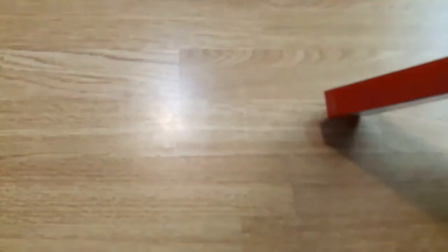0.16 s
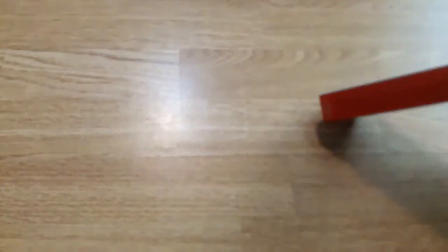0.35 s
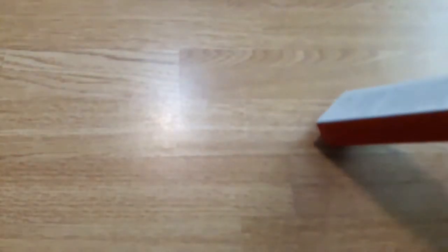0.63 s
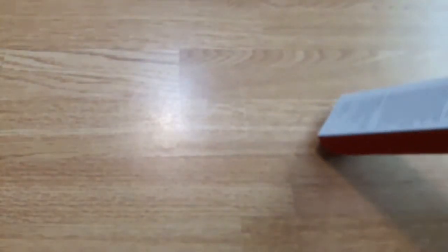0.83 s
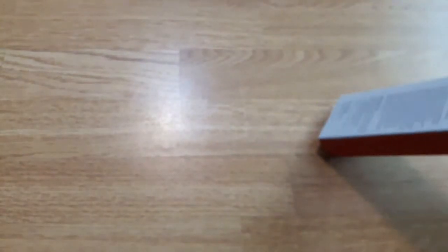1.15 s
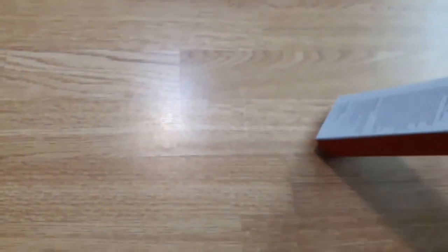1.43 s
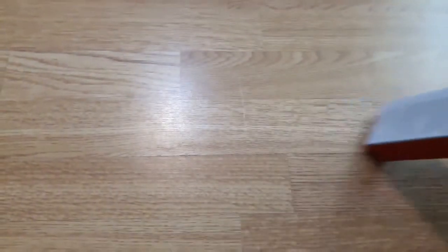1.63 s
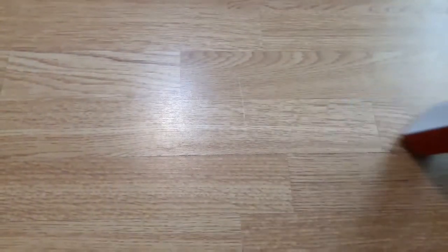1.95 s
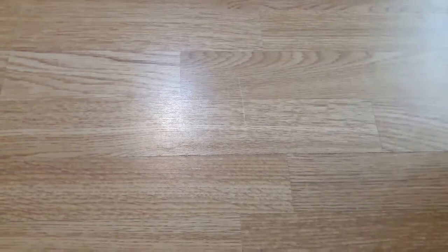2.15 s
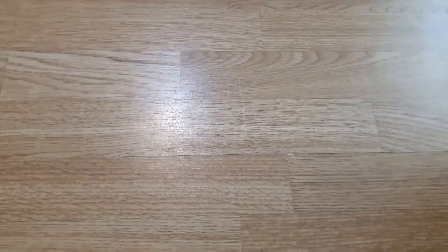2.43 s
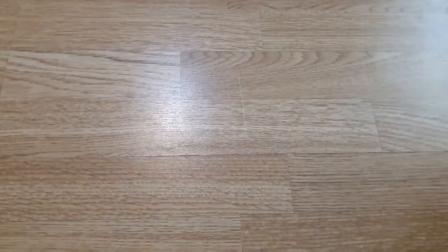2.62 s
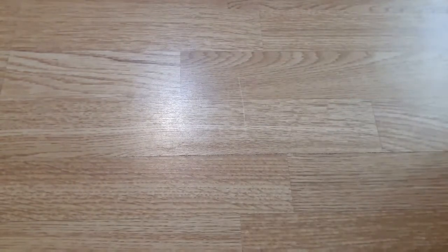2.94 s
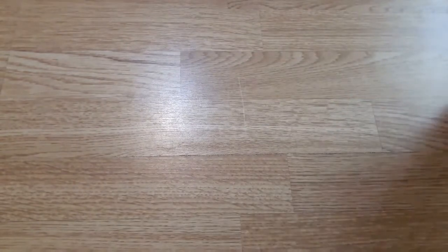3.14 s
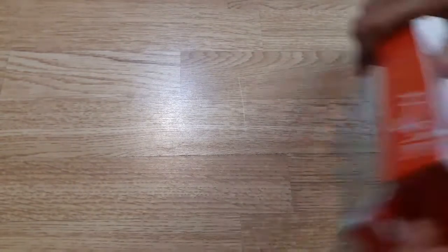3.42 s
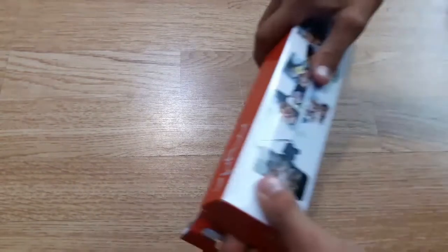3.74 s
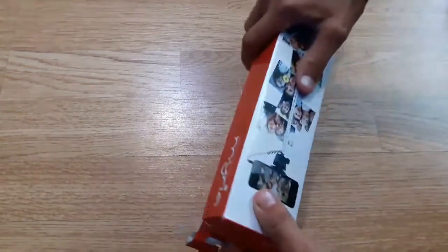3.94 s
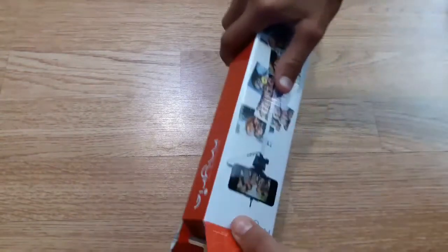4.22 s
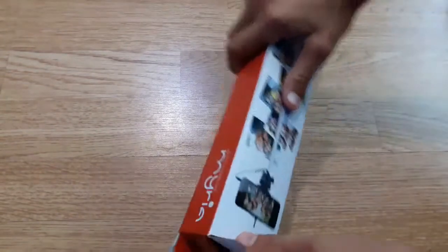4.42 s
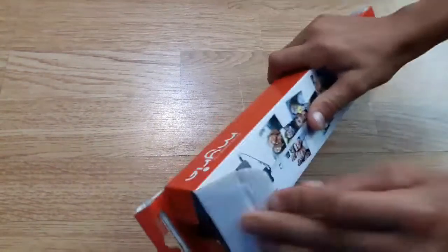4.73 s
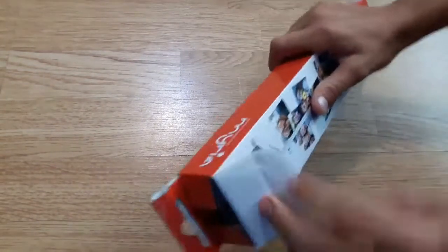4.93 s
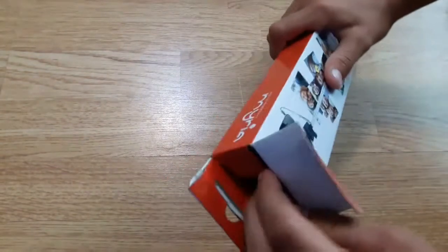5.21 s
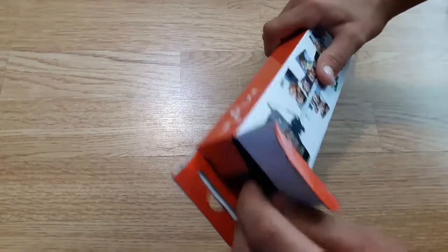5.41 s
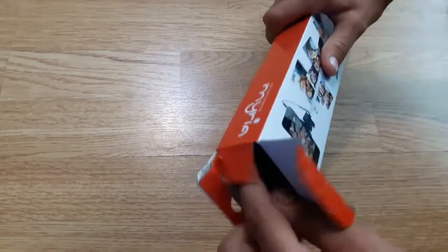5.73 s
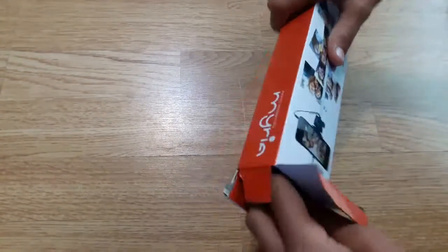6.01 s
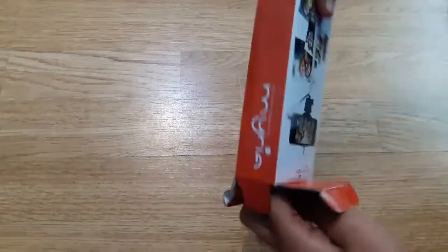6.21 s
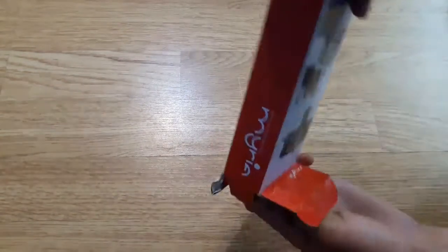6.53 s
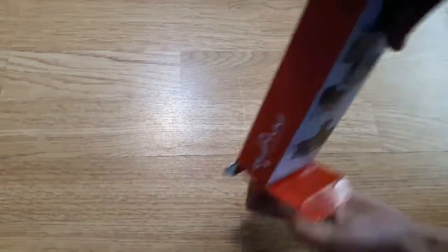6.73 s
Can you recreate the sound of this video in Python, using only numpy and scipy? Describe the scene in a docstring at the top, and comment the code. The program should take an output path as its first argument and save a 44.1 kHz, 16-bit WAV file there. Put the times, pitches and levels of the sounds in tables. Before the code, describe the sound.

A slim cardboard box is rubbed and knocked close by, then its flap tab snaps open with two hard knocks, scuffs and rustling in a small room.

```python
"""A slim cardboard box is handled on a wooden floor close to a stereo microphone, in a small room with a faint hum.
First the box is rubbed and knocked, and a face groans briefly; after a near lull with faint hollow knocks come drags
and scuffs. After a few stray snaps, the end flap's tab snaps in quick succession from 3.4 s, with the two hardest
knocks near 4.1 s; rubs, scuffs and lighter knocks follow to the end. Random friction and contact forces ring the
modes of cavity, faces, flap and tab; filtered noise makes the paper crackle, the room's echoes and the room tone."""
import sys
import numpy as np
from scipy import signal
from scipy.fft import rfft, irfft, next_fast_len
from scipy.io import wavfile
from scipy.ndimage import map_coordinates

SR = 44100
rng = np.random.default_rng(int(sys.argv[2]) if len(sys.argv) > 2 else 0)


def store_wav(level_fs):
    """Save 16-bit WAV to argv[1]."""
    pcm = np.round(np.clip(np.atleast_2d(level_fs), -1, 1) * 32767)
    wavfile.write(sys.argv[1], SR, pcm.T.astype(np.int16))


N = 302526

# nominal modes of the enclosed air: f/Hz, relative level/dB, t60/s
CAVITY_MODES = [(166, -26, 0.037), (193, -5.5, 0.094), (246.3, -10.5, 0.052)]
# nominal modes of the long faces: f/Hz, relative level/dB, t60/s
FACE_MODES = [(355, 2.7, 0.01), (399, 10.1, 0.023), (534, 4.9, 0.029), (709, 9.2, 0.02)]
# nominal modes of the end flap: f/Hz, relative level/dB, t60/s
FLAP_MODES = [(775, -11, 0.075), (897, 2.5, 0.034), (1030, 5.5, 0.026), (1160, 0.5, 0.058),
              (1293, 11, 0.0087)]
# nominal modes of the flap's tab: f/Hz, relative level/dB, t60/s
TAB_MODES = [(1638, 9, 0.0085), (1940, 4, 0.011), (2240, 13, 0.0032), (2556, -10.5, 0.014),
             (3370, -7, 0.0057), (4190, 9.5, 0.00098)]
# spectrum of paper-edge crackle: f/Hz, relative density/dB per Hz
EDGE_SPECTRUM = [(3000, -9.5), (4300, 7), (5000, 8.5), (7000, 4), (10000, -2), (15000, -6)]
# grip wandering over the box: t/s, hollow body re flap/dB, tab re flap/dB, paper-edge crackle/dB
GRIP_PATH = [(0, 5.5, -3.5, -0.5), (1.25, 11, -6, 2), (1.7, 2.5, -3, 1), (2.2, 3.5, 0.5, -2),
             (2.6, 14, 4, -2), (3.3, -7.5, -9, -4.5), (3.5, -27, -1, 0.5), (3.8, -20, -2.5, -3.5),
             (4.0, -16, -3, -3), (4.4, 5, -4.5, 1.5), (4.7, 4.5, 4.5, -0.5), (5.1, -5, -12, 5),
             (5.5, 0, -0.5, 1), (5.95, -1.5, 3, -1.5), (6.2, -7.5, 1.5, -2), (6.6, -17, 0, 1.5),
             (6.86, 3, 0, -5.5)]


def amp(db):
    """Amplitude ratio of a level in dB."""
    return 10 ** (np.asarray(db) / 20)


def unit(x):
    """x scaled to RMS 1."""
    return x / np.sqrt(np.mean(x ** 2) + 1e-20)


def top(x):
    """x scaled to peak 1."""
    return x / np.max(np.abs(x))


def along(points, hz):
    """Interpolate (f/Hz, value) points on a log frequency axis."""
    f, v = np.transpose(points)
    return np.interp(np.log(hz + 1), np.log(f + 1), v)


def curves(rows):
    """One value per sample for each column after the time."""
    s, *cols = np.transpose(rows)
    return [np.interp(np.arange(N) / SR, s, c) for c in cols]


def wobble(rate_hz):
    """Smooth random curve with rate_hz knots a second."""
    knots = rng.standard_normal(int(N * rate_hz / SR) + 4)
    return map_coordinates(knots, [np.arange(N) * rate_hz / SR])


def filtered(x, response):
    """x shaped by a response given as a function of f/Hz."""
    m = next_fast_len(x.shape[-1] + 8192)
    spectrum = rfft(x, m) * response(np.fft.rfftfreq(m, 1 / SR))
    return irfft(spectrum, m)[..., :x.shape[-1]]


def air():
    """Room tone, partly alike at both ports only in the bass, and the narrow wavering hum of a far appliance."""
    # room tone and hiss: f/Hz, relative density/dB per Hz
    tone_spectrum = [(24, -24), (40, 27.5), (53, 13.5), (112, 10.5), (167, 4.5), (269, -7), (1720, -15.5),
                     (8990, -37), (14100, -33.5), (16000, -55)]
    # left-right correlation of the room tone: f/Hz, correlation (1 = alike)
    tone_likeness = [(60, 0.4), (150, 0), (300, 0), (700, 0)]
    # appliance hum: centre f/Hz, width/Hz, level/dB
    hum_setting = (165.6, 5, -62.5)

    def mid_side(hz):
        angle = np.arccos(np.clip(along(tone_likeness, hz), -1, 1)) / 2
        return amp(along(tone_spectrum, hz)) * [np.cos(angle), np.sin(angle)]

    mid, side = filtered(rng.standard_normal((2, N)), mid_side)
    tone = unit(np.array([mid + side, mid - side]))
    hum_hz, width_hz, hum_db = hum_setting
    hum = filtered(rng.standard_normal(N), lambda hz: np.exp(-((hz - hum_hz) / width_hz) ** 2))
    return amp(-54.5) * tone + amp(hum_db) * unit(hum)


def echoes(x, t60, size):
    """x through unrelated left and right noise tails, drawn anew each quarter tail so no fixed colour builds up."""
    out = np.zeros((2, N + 2 * size))
    step = size // 4
    for at in range(0, N, step):
        hz, t, z = signal.stft(rng.standard_normal((2, size)), SR, nperseg=64)
        decay = amp(-60 * t / along(t60, hz)[:, None])
        tail = signal.istft(z * decay, SR, nperseg=64)[1]
        tail = tail / np.linalg.norm(tail, axis=1, keepdims=True)  # energy 1
        piece = signal.fftconvolve(x[None, at:at + step], tail, axes=1)
        out[:, at:at + piece.shape[1]] += piece
    return out[:, :N]


def room(x):
    """The walls answer after a few milliseconds with frequency-dependent decay."""
    # reverberation: f/Hz, t60/s
    room_t60 = [(150, 0.37), (1000, 0.31), (5000, 0.24), (15000, 0.19)]
    # room against direct sound: f/Hz, level/dB
    room_level = [(100, -18.5), (400, -8.5), (1500, -4.5), (5000, -6), (12000, 0)]
    delayed = np.pad(x, (200, 0))
    return echoes(filtered(delayed, lambda hz: amp(along(room_level, hz))), room_t60, size=22000)


def ports(x):
    """Arrival time and level place the box; hands and floor scatter the treble to each port differently."""
    # box position: t/s, left lag/samples, left-right level/dB
    box_place = [(0, 6.5, -0.5), (1.5, 4.5, -2), (2.6, 15, -1.5), (3.2, 10.5, -4), (3.6, -1, 0.5),
                 (5, -1.5, 1.5), (6.86, -3, 0)]
    # the camera body favours one port: f/Hz, left-right level/dB
    body_shade = [(100, -1), (1000, -4), (5000, -3.5), (8000, 1.5), (14000, 2.5)]
    lag, pan_db = curves(box_place)
    side = np.array([[.5], [-.5]])
    direct = np.array([map_coordinates(x, [at], order=3) for at in np.arange(N) - side * lag])
    treble = filtered(x, lambda hz: hz ** 2 / (hz ** 2 + 4000 ** 2))
    scattered = echoes(treble, [(5000, 0.0065)], size=4096)
    shaded = filtered(direct + amp(4.5) * scattered, lambda hz: amp(side * along(body_shade, hz)))
    return amp(side * pan_db) * shaded


def ring(modes):
    """Decaying sines answer one push; the grip shifts each mode's pitch and strength a little."""
    t = np.arange(SR // 8) / SR
    hz, db, t60 = np.transpose(modes)[:, :, None]
    shift_db = 2.5 * rng.standard_normal((len(modes), 1))
    detune = .03 * rng.standard_normal((len(modes), 1))
    decay = amp(db + shift_db - 60 * t / t60)
    return np.sum(decay * np.sin(2 * np.pi * hz * (1 + detune) * t), axis=0)


def fibres(share, spread_db):
    """Friction force: fibres that catch and let go over a smooth drag."""
    strength = amp(spread_db * np.minimum(rng.exponential(size=N), 4))
    catches = (rng.random(N) < share) * rng.standard_normal(N) * strength
    return unit(unit(catches) + 1.4 * rng.standard_normal(N))


def regripped(force, modes):
    """A steady force rings the box; the grip changes every 50 ms or so, cross-faded."""
    hop = 2048
    out = np.zeros(N + SR)
    force, fade = np.pad(force, (hop, SR)), np.hanning(2 * hop)
    for at in range(0, N + hop, hop):
        piece = signal.fftconvolve(force[at:at + 2 * hop] * fade, ring(modes))
        out[at:at + len(piece)] += piece
    return unit(out[hop:hop + N])


def rubbing():
    """One uneven finger drag drives all parts of the box; the tab's paper edge hisses with it."""
    # finger drag on the card: t/s, flap level/dB before unevenness
    finger_drag = [(0, -60), (.13, -52.5), (.3, -63), (.47, -65), (.6, -83), (1.25, -82.5), (1.68, -53.5),
                   (1.77, -60.5), (1.96, -55.5), (2.08, -56.5), (2.28, -57.5), (2.6, -77.5), (2.92, -57.5),
                   (3.16, -61), (3.34, -49), (3.47, -61.5), (3.62, -51), (3.79, -68), (3.98, -49),
                   (4.04, -54), (4.17, -50), (4.42, -68.5), (4.63, -69), (5.07, -53), (5.3, -65),
                   (5.7, -61), (5.85, -60.5), (5.89, -56), (6.03, -57.5), (6.08, -62.5), (6.12, -52),
                   (6.37, -54.5), (6.41, -63.5), (6.6, -61.5), (6.71, -59), (6.86, -53)]
    flap_db, = curves(finger_drag)
    body_re_flap_db, tab_re_flap_db, crackle_db = curves(GRIP_PATH)
    body_db, tab_db = flap_db + body_re_flap_db, flap_db + tab_re_flap_db
    force = fibres(share=.03, spread_db=1.8)
    edge = unit(filtered(force, lambda hz: amp(along(EDGE_SPECTRUM, hz))))
    levels = [(flap_db, FLAP_MODES), (body_db - 5.5, CAVITY_MODES), (body_db, FACE_MODES), (tab_db, TAB_MODES)]
    parts = sum(amp(db) * regripped(force, modes) for db, modes in levels)
    uneven = amp(1.7 * wobble(25) + 2.4 * wobble(70))
    edge_db = tab_db + crackle_db - 10.5 + 2.5 * wobble(42)
    return uneven * (parts + amp(edge_db) * edge)


def groan():
    """A thumb makes a long face shudder: stick-slip near its mode gives a rough, wavering tone."""
    # shudder path before wavering: t/s, f/Hz, level/dB
    shudder = [(.04, 375.2, -66), (.085, 378.5, -36.5), (.1, 400, -40), (.125, 380, -28.5), (.14, 411, -41),
               (.165, 355, -29.5), (.2, 355, -53)]
    hz, db = curves(shudder)
    unsteady, throb = .07 * wobble(150), amp(3 * wobble(120))
    phase = 2 * np.pi * np.cumsum(hz * (1 + unsteady)) / SR
    sounding = np.arange(N) < shudder[-1][0] * SR
    return sounding * amp(db) * throb * (np.sin(phase) + 0.26 * np.sin(1.5 * phase))


def contacts(rows, shape):
    """Each contact is a rough push of the given shape that rings the parts of the box."""
    out, t_ms = np.zeros(N + SR), 1000 * np.arange(SR // 6) / SR
    crackle_db = curves(GRIP_PATH)[-1]
    for s, db, cavity_db, faces_db, tab_db, edge_db, ms in rows:
        at = round(s * SR)
        force = rng.standard_normal(len(t_ms)) * shape(t_ms, max(ms, 1))
        levels = [(0, FLAP_MODES), (cavity_db, CAVITY_MODES), (faces_db, FACE_MODES), (tab_db, TAB_MODES)]
        sound = sum(amp(level) * top(signal.fftconvolve(force, ring(modes))) for level, modes in levels)
        edge = top(filtered(force, lambda hz: amp(along(EDGE_SPECTRUM, hz))))
        sound[:len(force)] += amp(edge_db + crackle_db[at]) * edge
        out[at:][:len(sound)] += amp(db) * sound
    return out[:N]


def scuff_swell(t_ms, swell_ms):
    """A scuff swells as the surfaces gather speed, then fades."""
    return (t_ms / swell_ms * np.exp(-t_ms / swell_ms)) ** 1.15


def scuffs():
    """Short scuffs of card on card; the nearer the grip is to the body, the more hollow they sound."""
    # scuffs: t/s, flap peak level/dB, tab re flap/dB, swell/ms (at least 1)
    scuff_list = [(0.182, -32, -38, 1.7), (1.306, -53, 1.5, 7.4), (1.42, -47, -2, 2.6), (1.573, -37, 0, 15),
                  (1.782, -50.5, 15.5, 4.5), (1.847, -27.5, -38, 7), (2.166, -26, -35, 5.7),
                  (2.335, -27, -40, 2.1), (2.358, -36.5, -23, 5.6), (2.467, -43.5, 4.5, 8.8),
                  (2.695, -46.5, -3, 4.3), (2.924, -49, -8, 3.4), (2.98, -42, -14, 7.4),
                  (3.183, -34, 0.5, 35), (3.233, -37, 11, 7.7), (3.286, -20, -7.5, 5.7),
                  (3.811, -46, 3, 1.5), (3.843, -40.5, 13, 7.3), (4.047, -28.5, 3, 22),
                  (4.113, -19.5, -11, 7.2), (4.147, -23, -12, 13.7), (4.469, -38.5, -44, 18.7),
                  (4.741, -45.5, -0.5, 6.6), (4.826, -59.5, 15.5, 14), (4.924, -46.5, 1, 9.1),
                  (4.984, -36.5, -3, 7.3), (5.011, -34.5, -5, 2.6), (5.043, -28, -1, 8.2),
                  (5.126, -37.5, 0.5, 3.1), (5.241, -44.5, 7, 14.4), (5.393, -55, 19, 6),
                  (5.487, -43.5, 1.5, 9.3), (5.866, -54, 3, 8.1), (5.89, -44.5, 4.5, 13),
                  (5.945, -54.5, 21.5, 8.8), (6.117, -37, -29, 3.3), (6.249, -55, -18, 4.4),
                  (6.436, -38, -6.5, 3.6), (6.478, -49, 6, 3), (6.614, -38, 6, 15), (6.725, -42, 7, 20)]
    grip_db = curves(GRIP_PATH)[0]
    rows = []
    for s, db, tab_db, swell_ms in scuff_list:
        body_db = -9 + 0.6 * grip_db[round(s * SR)]
        edge_db = -12 + 0.33 * tab_db
        rows.append((s, db, body_db, body_db, tab_db, edge_db, swell_ms))
    return contacts(rows, scuff_swell)


def push(t_ms, t60_ms):
    """A blow builds up over about a millisecond and dies away."""
    return (1 - np.exp(-(t_ms / 0.66) ** 2)) * amp(-60 * t_ms / t60_ms)


def slips():
    """The tab catches and slips in its slot: dry snaps that do not reach the long faces."""
    # tab slips: t/s, tab peak level/dB, flap re tab/dB
    slip_list = [(0.031, -45, -3), (1.004, -52.5, 1.5), (2.103, -39, -2), (2.425, -32, 0.5),
                 (3.414, -22.5, -22), (3.439, -21.5, -24), (3.493, -23, -20), (3.525, -21, -17),
                 (3.555, -19, -28), (3.577, -23, -15), (3.597, -26.5, -15), (3.647, -50, 5),
                 (3.681, -34.5, 2.5), (3.704, -45, -7), (3.733, -33.5, -8), (3.853, -19, -24),
                 (3.902, -34, -12), (3.93, -35.5, -12), (3.946, -40, -8), (3.955, -40, 0),
                 (3.972, -42, -17), (4.019, -35.5, 1), (4.077, -15, 1), (4.152, -26, -2), (4.183, -30, -13),
                 (4.886, -44, -20), (4.933, -33.5, -30), (5.013, -37, -18), (5.022, -35, -12),
                 (5.187, -53, 7), (5.258, -28.5, -3), (5.336, -21, -13), (5.757, -27, -33),
                 (6.001, -34, -1.5), (6.019, -32, -5), (6.089, -34, -6.5), (6.538, -35, 0)]
    cavity_re_tab_db, edge_re_tab_db, t60_ms = -21.5, -10.5, 7.05
    muffle = 0.14  # dB less edge crackle per dB of flap motion
    rows = []
    for s, db, flap_db in slip_list:
        edge_db = edge_re_tab_db - (1 + muffle) * flap_db
        rows.append((s, db + flap_db, cavity_re_tab_db - flap_db, -np.inf, -flap_db, edge_db, t60_ms))
    return contacts(rows, push)


def knocks():
    """Knocks on the floor and in the hands ring every part; one that stirs the cavity more lies on longer."""
    # knocks: t/s, flap peak level/dB, then re flap: cavity/dB, long faces/dB, tab/dB
    knock_list = [(0.25, -46, 23.5, 19, -6), (0.276, -49, -16, 23.5, -6), (0.379, -51, -13, 10.5, 9),
                  (0.425, -55.5, 20, 1, -14), (0.503, -44, -4, 0, 1.5), (1.064, -71.5, 27.5, 1, -14),
                  (1.168, -73.5, 30.5, 1, -15), (1.833, -35.5, -4, 7.5, 0), (1.885, -30, -10, 2, -20),
                  (2.111, -19.5, -2, -4, -11), (2.234, -26.5, -3.5, 6.5, 2.5), (2.63, -30, -45, -2, -9),
                  (2.85, -35.5, -26, 2.5, -13), (3.256, -21, -0.5, -8, -3), (3.281, -17.5, 3, 1.5, -9.5),
                  (4.075, -3, -18.5, -7, -14.5), (4.102, -8.5, -6, -9.5, -8.5), (4.22, -28, -7, -27, -27),
                  (4.325, -43, 7, 1.5, -20), (4.661, -42.5, 16.5, -2, -3), (4.686, -28.5, -19, -14, -23),
                  (5.335, -37.5, -6, 8, 8.5), (5.755, -23, -20, -11, -11), (6.261, -34.5, -1.5, 0.5, -1),
                  (6.306, -25.5, -3, 1, 4), (6.686, -27.5, -2, -8, -29), (6.753, -25.5, 6.5, 6, -8),
                  (6.781, -22.5, -9, 0.5, 7)]
    rows = []
    for s, db, cavity_db, faces_db, tab_db in knock_list:
        edge_db = -12.5 + 0.82 * tab_db
        t60_ms = 26.2 + 0.5 * cavity_db
        rows.append((s, db, cavity_db, faces_db, tab_db, edge_db, t60_ms))
    return contacts(rows, push)


def scene():
    """Direct sound at both ports, the room's answer and the room tone."""
    box = rubbing() + knocks() + scuffs() + groan()
    snaps = slips()
    to_room = box + amp(-3) * snaps  # the slot faces the microphone, so less room
    return ports(box + snaps) + room(to_room) + air()


def record(dry):
    """Overall tone colour, a preamplifier that rounds off the loudest peaks, a top cut, slight converter offset."""
    # overall tone colour, weak bass, treble ending steeply near 15.8 kHz: f/Hz, level/dB
    tone_colour = [(30, -35.5), (100, -15), (200, -5), (15600, 8.5), (15900, -56)]
    top_hz = 16800  # nothing is left above
    x = filtered(dry, lambda hz: amp(along(tone_colour, hz)))
    x = x / (1 + np.abs(x / .75) ** 4) ** (1 / 4)
    return filtered(x, lambda hz: hz < top_hz) - .0005


dry = scene()
out = record(dry)
store_wav(out)
```